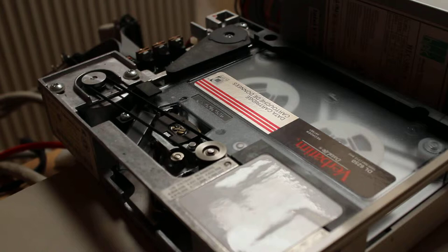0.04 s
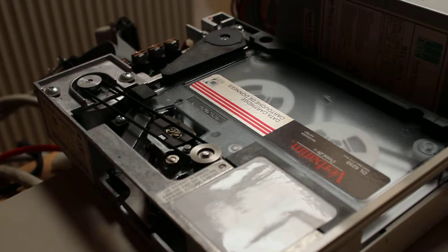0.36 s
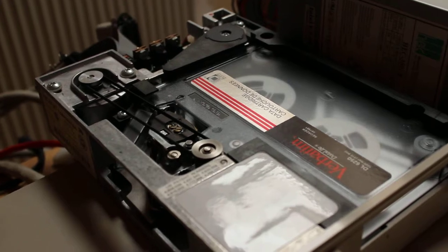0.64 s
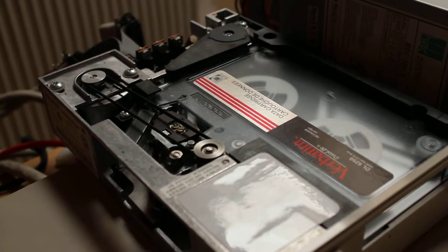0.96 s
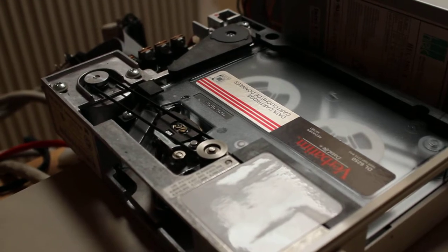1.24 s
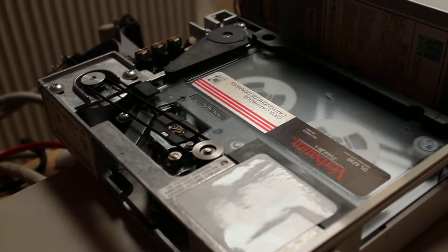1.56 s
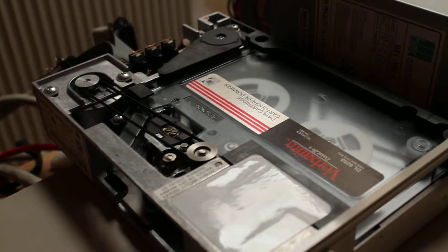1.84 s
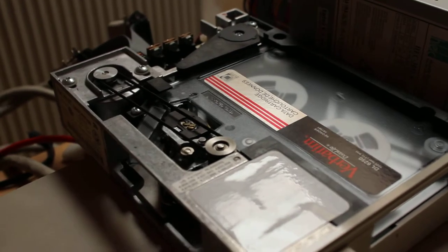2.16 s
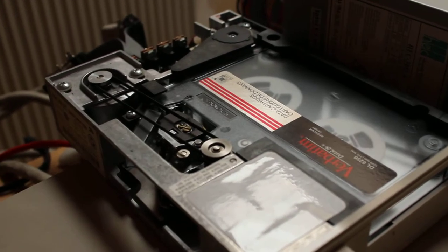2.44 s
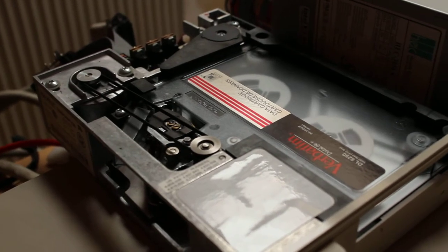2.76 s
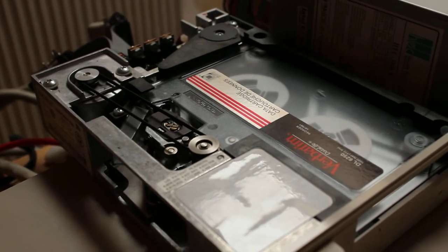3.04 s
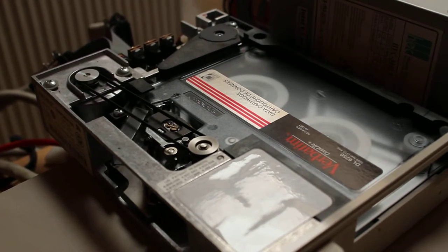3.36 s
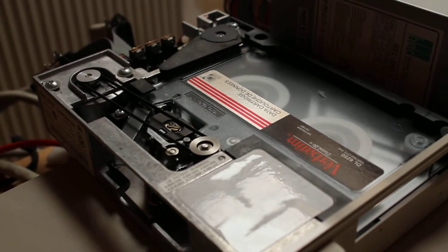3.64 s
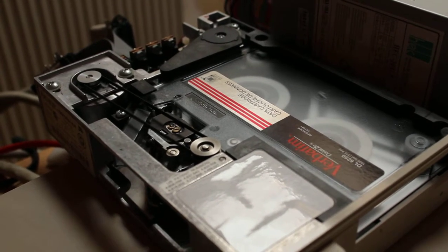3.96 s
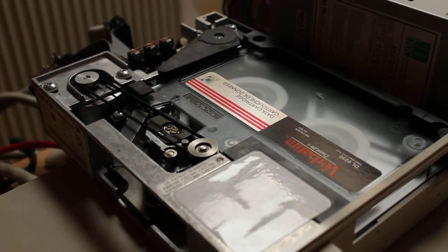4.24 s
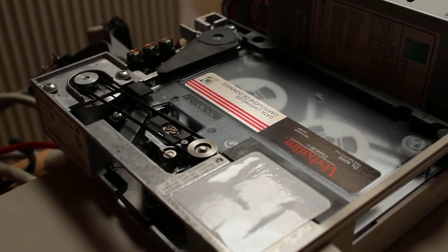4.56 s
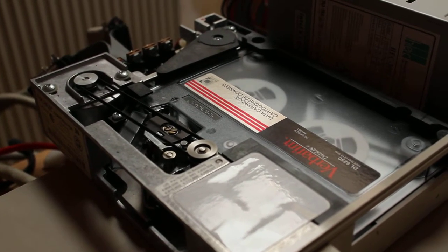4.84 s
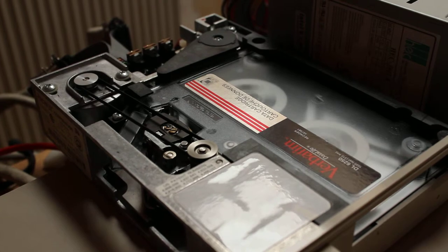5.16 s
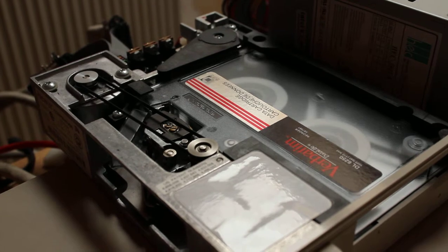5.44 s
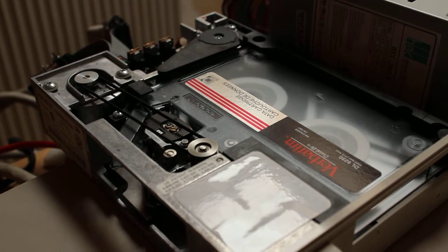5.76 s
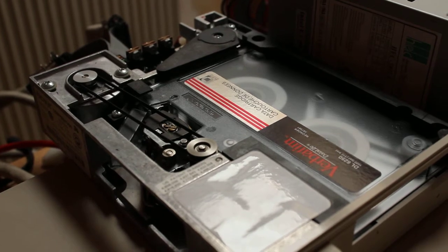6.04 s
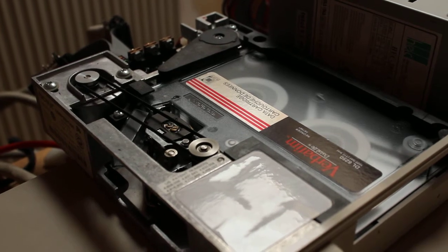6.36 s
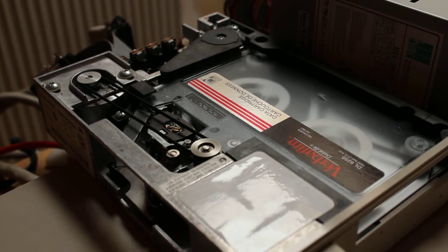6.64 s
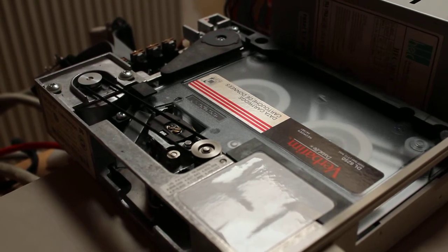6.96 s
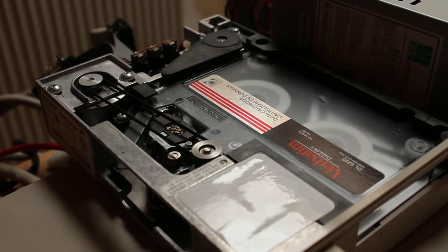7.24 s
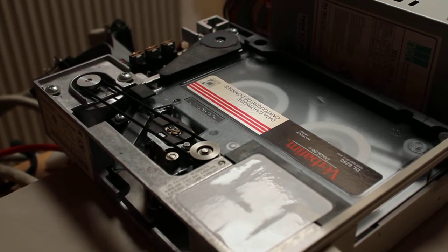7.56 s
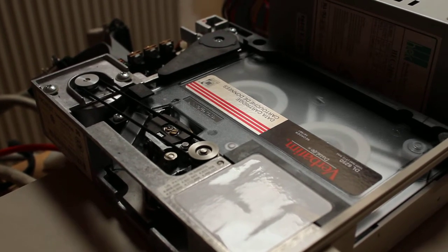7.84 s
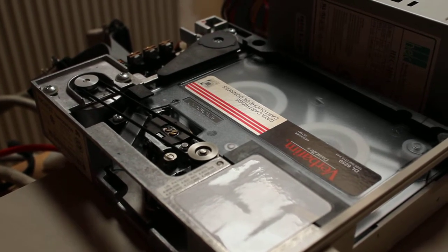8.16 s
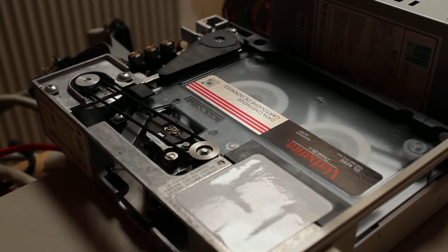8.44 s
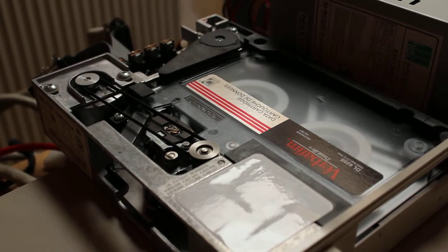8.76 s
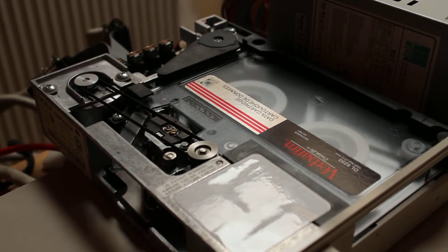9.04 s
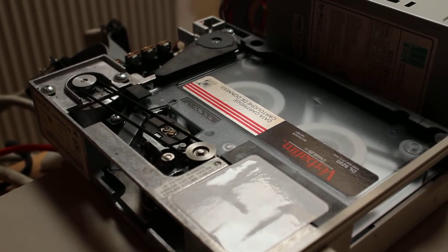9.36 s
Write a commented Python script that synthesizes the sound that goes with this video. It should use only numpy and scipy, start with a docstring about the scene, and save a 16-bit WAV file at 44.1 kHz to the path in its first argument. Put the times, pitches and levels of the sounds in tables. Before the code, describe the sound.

For almost three seconds there is only the faint, airy hum of a computer in a quiet room, with a tiny tick near 0.5 seconds and a soft bump around 2.2. At 2.8 seconds a small motor in a nearby tape drive buzzes softly. At 3.3 the drive spins up quickly into a much louder whirring whine with tape hiss, and a rapid string of high, fading belt squeaks follows from 3.5 to 3.9. It winds down by 4.5, and a fainter buzz fills the gap. From 5.2 to 6.6 seconds the tape rewinds, the loudest part, with a harsh, fast rattling buzz over the whine. After a very brief stop, the drive starts again at 6.7 with a smoother, steady whine and whir, easing slightly and running until nearly 10 seconds. The drive is close and a little to the right.

```python
"""An open cartridge tape drive, heard from close by, winds forward, back, and forward again.
Its capstan forces the cartridge to vibrate at multiples of the rotation rate, giving a whine; the tape
rushes over its guides, the belt judders and squeaks, and a roller knocks once a turn, loudest in reverse.
The head stepper buzzes before the first two runs. Behind it all a computer hums in a quiet room."""
import sys
import numpy as np
from scipy import signal
from scipy.fft import rfft, irfft
from scipy.io import wavfile

SR = 44100
rng = np.random.default_rng(int(sys.argv[2]) if len(sys.argv) > 2 else 0)


def store_wav(level_fs):
    """Save 16-bit WAV to argv[1]."""
    pcm = np.round(np.clip(np.atleast_2d(level_fs), -1, 1) * 32767)
    wavfile.write(sys.argv[1], SR, pcm.T.astype(np.int16))


N = 423360
T = np.arange(N) / SR
HZ = np.maximum(np.arange(N // 2 + 1) * SR / N, 1)


def from_db(db):
    """Amplitude grows tenfold for every 20 dB."""
    return 10 ** (np.asarray(db) / 20)


def rms_one(x):
    """Normalisation to unit power."""
    return x / np.sqrt(np.mean(x ** 2) + 1e-20)


def at_hz(points, hz):
    """Interpolation of a table along log frequency."""
    f, value = np.transpose(points)
    return np.interp(np.log(np.maximum(hz, 1)), np.log(f), value)


def peaks_db(resonances, hz):
    """Each resonance or notch adds a Lorentzian curve to the response in dB."""
    return sum(db / (1 + (2 * (hz - centre) / width) ** 2) for centre, width, db in resonances)


def tint(x, colour_db):
    """Filtering multiplies the spectrum by a gain at every frequency."""
    return irfft(rfft(x) * from_db(colour_db), N)


def noise(colour_db):
    """Filtered white noise of unit power."""
    return rms_one(tint(rng.standard_normal(N), colour_db))


def drift(rate):
    """Random modulation: straight lines join `rate` Gaussian values a second."""
    knots = rng.standard_normal(4096)
    return np.interp(T * rate % len(knots), np.arange(len(knots)), knots)


def swell(centre, width):
    """A Gaussian envelope in time."""
    return np.exp(-np.minimum(((T - centre) / width) ** 2, 100))


# Spectrum of the fan's air. Each row: frequency in Hz, relative density in dB.
FAN_AIR = [(25, -12), (90, -20.5), (130, -12.5), (240, -13.5), (345, -2), (470, -8.5), (780, -1),
           (950, -3.5), (1350, -3), (1850, -12), (2400, -11), (4000, -18.5), (4800, -18.5), (5400, -19),
           (15000, -27)]
# The computer's hum and its disk's whistles. Each row: frequency in Hz, level in dB.
HUM_TONES = [(597.5, -81), (721.4, -83), (845.2, -76.5), (1620, -81.5), (1771, -83.5), (2471, -85.5)]
WHISTLES = [(4597, -84), (4748, -85.5), (6794, -100)]

def computer(air_db=-67.5, waver_db=2.5, spurts_per_s=9):
    """Superposition: broadband fan air, slowly modulated tones, and disk whistles in short spurts."""
    disk = sum(from_db(db) * rms_one(drift(spurts_per_s)) * np.sin(2 * np.pi * hz * T)
               for hz, db in WHISTLES)
    hum = sum(from_db(db + waver_db * drift(11)) * np.sin(2 * np.pi * hz * T + .5 * drift(6.2))
              for hz, db in HUM_TONES)
    return np.sqrt(2) * (disk + hum) + from_db(air_db) * noise(at_hz(FAN_AIR, HZ))


# Ticks in the mechanism. Each row: time in seconds, level in dB.
LIGHT_TICKS = [(.548, -71), (2.799, -70)]
# Low thuds: a soft bump before the first run, and the deck's boom as the reverse run brakes.
# Each row: time in seconds, thud level in dB, boom level in dB.
LOW_THUDS = [(2.235, -75, -73), (6.54, -84, -74)]

def ticks_and_thuds(boom_hz=205):
    """Short transients are bright; longer thuds are dull and excite a low resonance."""
    tick = sum(from_db(db) * (swell(s, .004) + .3 * swell(s + .008, .02)) for s, db in LIGHT_TICKS)
    thud = sum(from_db(db) * swell(s, .03) for s, db, _ in LOW_THUDS)
    boom = sum(from_db(db) * swell(s + .035, .045) for s, _, db in LOW_THUDS)
    bright = noise(at_hz([(1500, -4), (4000, 0), (6500, 1), (11000, -20)], HZ))
    dull = noise(at_hz([(30, -10), (110, -6), (200, -2), (450, -37)], HZ))
    return tick * bright + thud * dull + boom * np.sin(2 * np.pi * boom_hz * T)


# The driver's note before each run. Each row: time in seconds, level in dB.
DRIVER_NOTES = [(3.255, -71), (5.175, -72), (6.675, -71)]

def motor_driver(pitch_hz=2780):
    """Current building in the standing motor excites a faint tone and its second harmonic."""
    phase = 2 * np.pi * pitch_hz * T + drift(200)
    envelope = sum(from_db(db) * swell(s, .025) for s, db in DRIVER_NOTES)
    return envelope * (np.sin(phase) + .3 * np.sin(2 * phase))


# Head moves. Each row: start and end in seconds, step rate in Hz, tone gain in dB, rasp level in dB.
STEPPER_MOVES = [(2.813, 3.231, 565, -64, -67), (4.57, 5.192, 520, -73, -73)]
# The stepper's tone. Each row: multiple of the step rate, relative level in dB.
STEP_HARMONICS = [(1, -11.5), (2, -1), (3, -16), (5, -24)]

def head_stepper(rise_s=.074, stop_s=.045):
    """Periodic steps radiate harmonics of the step rate while the lead screw rasps."""
    rasp_colour = [(150, -16), (550, -4.5), (920, 0), (1130, 6), (1500, -11), (2500, -11), (8000, -32)]
    out, rasp = np.zeros(N), noise(at_hz(rasp_colour, HZ))
    for start, end, step_hz, tone_db, rasp_db in STEPPER_MOVES:
        on = (T > start) & (T < end)
        t = T[on]
        tone = sum(from_db(db) * np.sin(2 * np.pi * k * step_hz * t) for k, db in STEP_HARMONICS)
        envelope = np.clip(np.minimum((t - start) / rise_s, (end - t) / stop_s), 0, 1)
        out[on] += envelope * (np.sqrt(2) * from_db(tone_db) * tone + from_db(rasp_db) * rasp[on])
    return out


# Two slipping spots on the belt.
# Each row: first squeak in seconds, its peak level in dB, pitch in Hz, glide in Hz per second.
SLIP_SPOTS = [(3.475, -39, 4980, -150000), (3.514, -39.5, 3160, 120000)]

def belt_squeaks(loop_s=.0905, loops=5, width_s=.003, fade_db_per_s=23):
    """Friction: as the first run takes up slack, each spot slips once a loop in a rough, fading chirp."""
    out, rough_phase = np.zeros(N), 1.2 * drift(2200)
    for first, db, pitch_hz, glide in SLIP_SPOTS:
        for delay in loop_s * np.arange(loops):
            near = abs(T - first - delay) < .01
            t = T[near] - first - delay
            chirp = np.sin(2 * np.pi * t * (pitch_hz + glide * t / 2) + rough_phase[near])
            out[near] += from_db(db - fade_db_per_s * delay) * np.exp(-(t / width_s) ** 2) * chirp
    return out


TURN_HZ = 77.65  # the capstan's rotation rate at full speed

def capstan_speed(t, start, brake, braking_s, spin_up_s=.069, servo_aim=1.045):
    """Speed rises exponentially until the servo holds it at 1 (full), then brakes linearly."""
    rising = servo_aim * (1 - np.exp((start - t) / spin_up_s))
    return np.minimum(rising, 1) * np.clip(1 - (t - brake) / braking_s, 0, 1)


def roller_knocks(turns, roller_hz=33.5, sway_db=1.1, uneven_db=.2, ring_s=.006, repeat_share=.65):
    """One impact a capstan turn excites a damped response: part repeating ring, part fresh rattle."""
    n = len(turns)
    hits = np.flatnonzero(np.diff(np.floor(turns + .5)) > 0)
    sway = np.sin(2 * np.pi * turns[hits] * roller_hz / TURN_HZ)
    blows = np.zeros(n)
    blows[hits] = from_db(sway_db * sway + uneven_db * rng.standard_normal(512)[:len(hits)])
    decay, grit = np.exp(-T[:2048] / ring_s), rng.choice([-1, 1], N)
    decay /= np.sqrt(np.sum(decay ** 2) * TURN_HZ / SR)
    ring = signal.fftconvolve(blows, decay * grit[-len(decay):])[:n]
    rattle = signal.fftconvolve(blows, decay)[:n] * grit[:n]
    return np.sqrt(repeat_share) * ring + np.sqrt(1 - repeat_share) * rattle


def shell_squeal(turns, speed, gain_db=-1, at_speed=.94, width=.081):
    """Resonance: order 16 crosses a shell mode just under full speed, and dies as the servo locks."""
    crossing = np.exp(-((speed - at_speed) / width) ** 2)
    unlocked = np.clip((1 - speed) / .03, 0, 1)
    return from_db(gain_db) * crossing * unlocked * np.sin(2 * np.pi * 16 * turns)


# The cartridge's response, which also colours the rush. Each row: frequency in Hz, relative gain in dB.
CARTRIDGE = [(150, -36), (280, -19), (400, -8), (560, -4), (750, 8.5), (1020, 15), (1400, 4), (2600, 4.5),
             (3700, -2.5), (5000, -6), (6900, -11.5), (7800, -12.5), (10500, -20.5), (15000, -39)]

def whine(orders, turns, speed, waver_db):
    """Forced vibration: the capstan's harmonics slide through the cartridge's response with speed."""
    out, samples = np.zeros(len(turns)), np.arange(len(turns))
    knots = samples[::512]
    for k, db in orders:
        response_db = at_hz(CARTRIDGE, k * TURN_HZ * speed[knots]) - at_hz(CARTRIDGE, k * TURN_HZ)
        gain = from_db(db + response_db + waver_db * rng.standard_normal(len(knots)))
        out += np.interp(samples, knots, gain) * np.sin(2 * np.pi * (k * turns + rng.random()))
    return out / np.sqrt(np.sum(from_db([db for k, db in orders]) ** 2) / 2)


# The low whine in each direction. Each row: multiple of the rotation rate, relative level in dB.
FORWARD_ORDERS = [(1, -58), (2, -41.5), (3, -31.5), (4, -24), (5, -12.5), (6, -14.5), (7, -7), (8, 3),
                  (9, -7), (10, -39), (11, -12.5), (12, 3), (13, -30), (14, -5.5), (15, -5.5), (16, -10),
                  (17, -13.5), (18, -18), (19, -11), (20, -13), (21, -16), (22, -14.5), (23, -24.5),
                  (24, -13), (25, -23.5), (26, -16), (27, -21), (28, -22), (29, -16.5), (30, -32)]
REVERSE_ORDERS = [(1, -49), (2, -35.5), (3, -40), (4, -21.5), (5, -16.5), (6, -12.5), (7, -9.5), (8, 1.5),
                  (9, -13.5), (10, -5), (11, -1), (12, 1), (13, 1), (14, -6), (15, -3.5), (16, -6),
                  (17, -28), (18, -17), (19, -15), (20, -9.5), (21, -37), (22, -37), (23, -25), (24, -10),
                  (25, -13.5), (26, -31), (27, -25), (28, -14), (29, -8.5), (30, -19)]
# Spectra of the upper whine, belt judder and knocks. Each row: frequency in Hz, relative level in dB.
UPPER_SPECTRUM = [(2400, 10.5), (3400, -2.5), (4200, -6), (6000, -28), (9000, -37)]
JUDDER_SPECTRUM = [(120, -36), (230, -29), (350, -4), (800, 2), (1100, 3), (1400, -16), (4000, -41)]
KNOCK_SPECTRUM = [(400, -40), (900, -30), (1600, -17), (2200, 1.5), (2650, -0.5), (2800, -2.5),
                  (3050, -3.5), (3400, 5), (3700, 5.5), (3950, -2.5), (4350, 1), (5000, -4), (6300, -1),
                  (7400, -9), (8200, -16), (11000, -28.5), (12200, -26), (14000, -55)]
# Resonances and notches of the deck. Each row: centre in Hz, width in Hz, gain in dB.
DECK_RESONANCES = [(1390, 250, -2), (2440, 180, 2), (2540, 190, -7), (2834, 115, 3), (3680, 110, 4),
                   (4790, 190, 9.5), (5020, 220, -6), (5450, 220, 8), (6950, 280, 7), (8600, 480, 8.5),
                   (9940, 1030, 4)]
# The capstan's runs. Each row: start, brake onset and braking time in seconds; settled gains of
# low whine, upper whine, rush and knock in dB; throb depth as a ratio; slack boost in dB;
# settling time in seconds.
CAPSTAN_RUNS = [(3.296, 4.38, 0.15, -46, -59.5, -51.5, -58, 0.25, 6, 1.07),
                (5.202, 6.474, .12, -46, -61, -55, -42, 0, 4, 0.84),
                (6.707, 9.7, .12, -47.5, -63, -53.5, -57.5, 0.046, 2.5, 1.57)]

def tape_transport(judder_db=-2.5, throb_settle_s=.95, flutter=.0011):
    """Whine, rush and knocks grow as powers of the capstan's speed, and ease as the tape draws tight."""
    rush = noise(at_hz(CARTRIDGE, HZ) + peaks_db(DECK_RESONANCES, HZ))
    hiss = tint(rush, at_hz([(1200, -11), (2600, 2.5)], HZ))
    judder = from_db(judder_db) * noise(at_hz(JUDDER_SPECTRUM, HZ))
    wobble = 1 + flutter * drift(110)
    upper = np.arange(31, 84)  # orders of the upper whine
    upper_levels = at_hz(UPPER_SPECTRUM, upper * TURN_HZ) + peaks_db(DECK_RESONANCES, upper * TURN_HZ)
    out, knocking = np.zeros(N), np.zeros(N)
    for run, orders in zip(CAPSTAN_RUNS, (FORWARD_ORDERS, REVERSE_ORDERS, FORWARD_ORDERS)):
        start, brake, braking_s, low_db, upper_db, rush_db, knock_db, throb, boost_db, settle_s = run
        on = (T > start) & (T < brake + braking_s)
        t = T[on]
        speed = capstan_speed(t, start, brake, braking_s)
        turns = np.cumsum(speed * wobble[on]) * TURN_HZ / SR
        slack_db = boost_db * np.exp((start - t) / settle_s)
        low_gain = from_db(low_db + .65 * slack_db) * speed
        whir_gain = from_db(slack_db) * speed ** 1.53
        # below full speed the belt judders; the clean whine takes over as the speed settles
        steady = speed ** 3
        low_whine = np.sqrt(steady) * whine(orders, turns, speed, waver_db=.5)
        out[on] += low_gain * (np.sqrt(1 - steady) * judder[on] + low_whine + shell_squeal(turns, speed))
        upper_orders = list(zip(upper, upper_levels + rng.standard_normal(len(upper))))
        upper_whine = steady * whine(upper_orders, turns, speed, waver_db=2.5)
        out[on] += whir_gain * from_db(upper_db) * upper_whine
        # the tape's hiss swells once a turn, most while it is still slack
        depth = throb * (.5 + np.exp((start - t) / throb_settle_s))
        pulsing = -depth * np.cos(2 * np.pi * turns)
        out[on] += whir_gain * from_db(rush_db) * (rush[on] + pulsing * hiss[on])
        knocking[on] += from_db(knock_db + slack_db) * speed ** 1.7 * roller_knocks(turns)
    return out + tint(knocking, at_hz(KNOCK_SPECTRUM, HZ))


def stereo(x, balance, coherence, scatter_s):
    """Partial coherence: both sides share the direct sound, but reflections off the case differ."""
    scatter = rng.standard_normal(N) * np.exp(-np.minimum(T / scatter_s, 100))
    scatter = rfft(scatter / np.sqrt(np.sum(scatter ** 2)))
    alike, sides = np.clip(at_hz(coherence, HZ), 0, 1), np.array([[1], [-1]])
    pan = from_db(sides * at_hz(balance, HZ) / 2)
    spread = np.sqrt((1 + alike) / 2) + sides * np.sqrt((1 - alike) / 2) * scatter
    return irfft(rfft(x) * spread * pan / pan.mean(axis=0), N)


# Level difference between the sides. Each row: frequency in Hz, left minus right in dB.
DRIVE_PAN = [(110, -8), (380, -13.5), (560, -5), (1000, -4.5), (2400, -4), (6500, -7), (8500, -3.5),
             (11000, 10.5)]
ROOM_PAN = [(60, 1.5), (180, -7.5), (550, -7.5), (1650, -4.5), (4970, -6.5), (15000, 1.5)]
# Likeness of the sides. Each row: frequency in Hz, coherence as a ratio (negative values act as 0).
DRIVE_COHERENCE = [(200, 0.16), (550, 0.76), (1100, 0.64), (2500, 1), (6000, 0.77), (9000, 0.033)]
ROOM_COHERENCE = [(60, -0.48), (240, 0.4), (950, 0.66), (3770, 0.45), (15000, -0.23)]

def scene():
    """Two sound fields add: the drive a little to the right, and the more diffuse background."""
    fade_out = np.clip((N / SR - T) / .003, 0, 1)
    drive = (tape_transport() + belt_squeaks() + head_stepper() + motor_driver()) * fade_out
    near = stereo(drive, DRIVE_PAN, DRIVE_COHERENCE, scatter_s=.015)
    return near + stereo(computer() + ticks_and_thuds(), ROOM_PAN, ROOM_COHERENCE, scatter_s=.016)


def record(dry, silent_s=.15, cutoff_hz=15700):
    """Gating and band limiting: a moment of silence opens the sound; a steep low-pass cuts the top."""
    low_pass = signal.ellip(12, .1, 80, cutoff_hz, fs=SR, output="sos")
    return signal.sosfilt(low_pass, dry * (T > silent_s))


dry = scene()
out = record(dry)
store_wav(out)
```